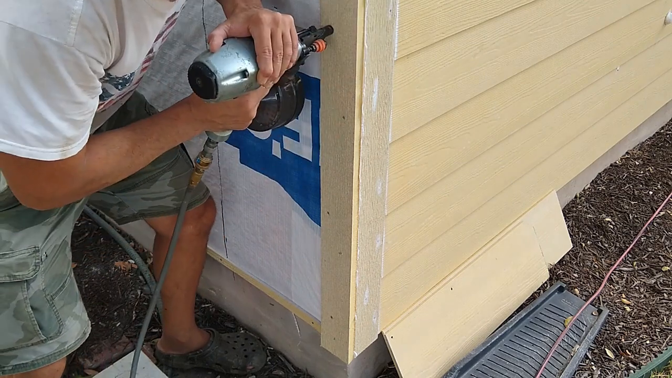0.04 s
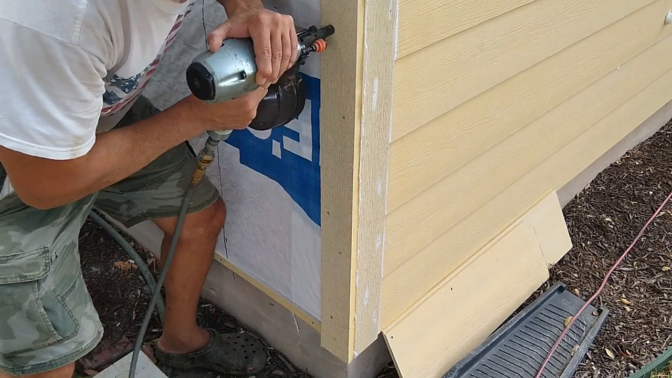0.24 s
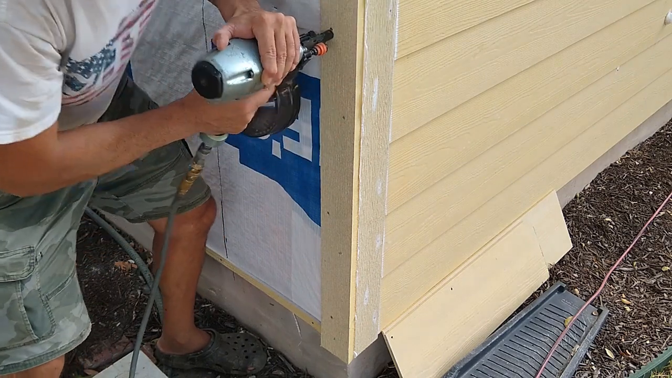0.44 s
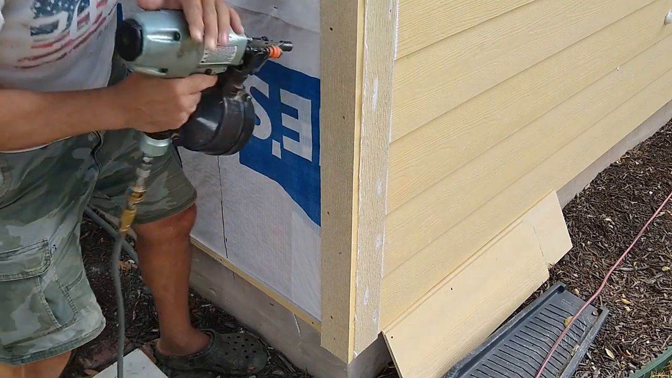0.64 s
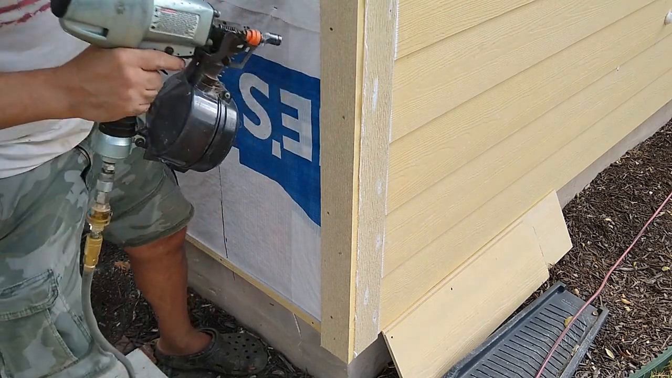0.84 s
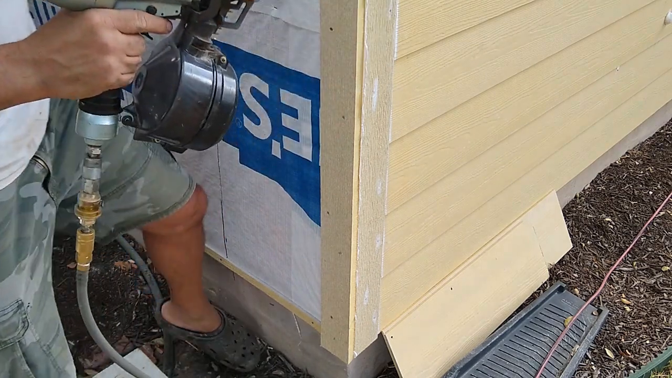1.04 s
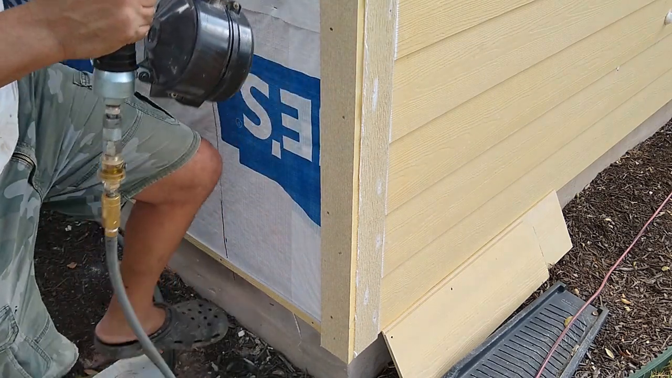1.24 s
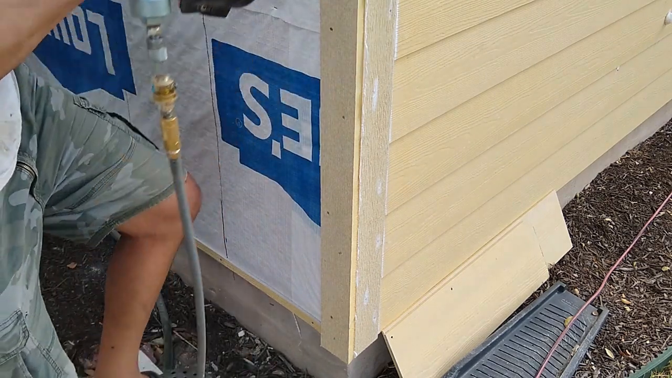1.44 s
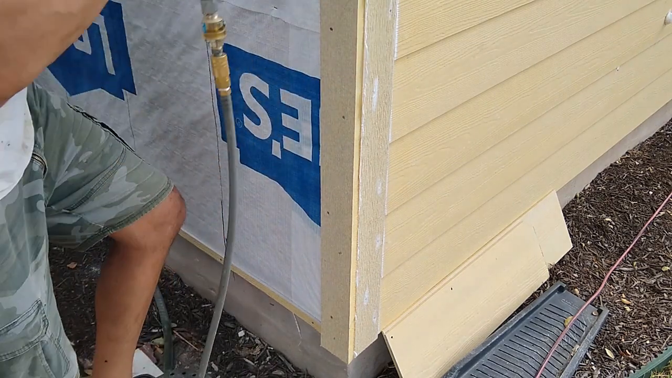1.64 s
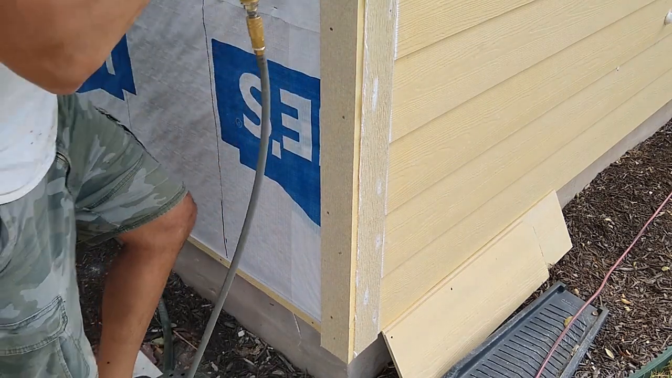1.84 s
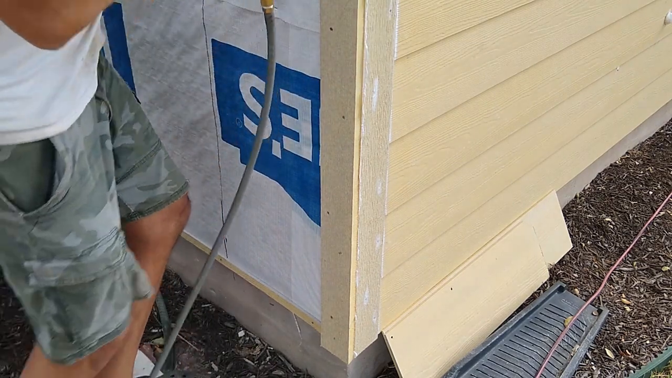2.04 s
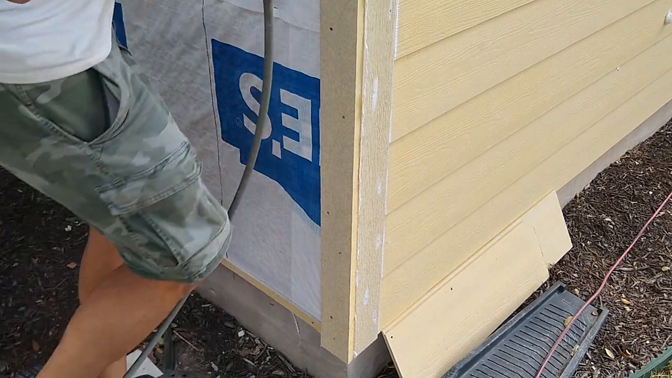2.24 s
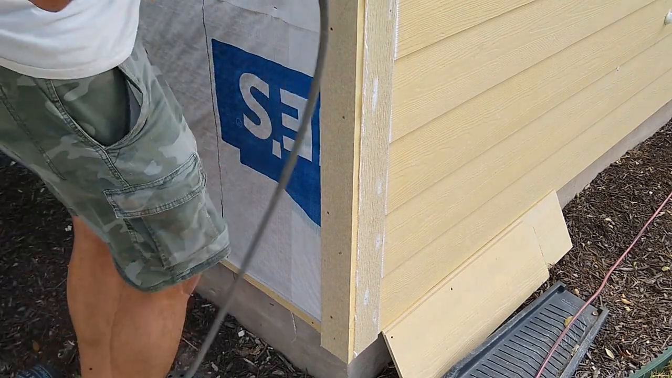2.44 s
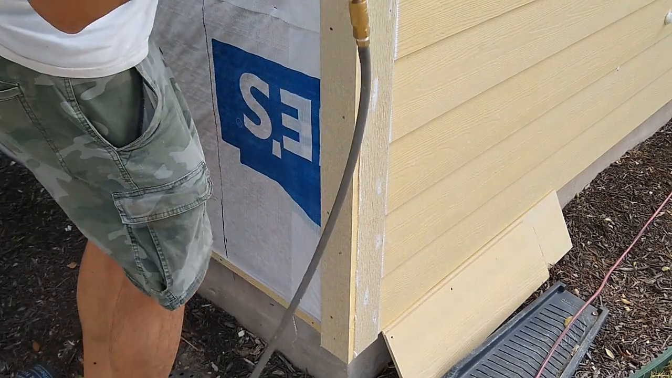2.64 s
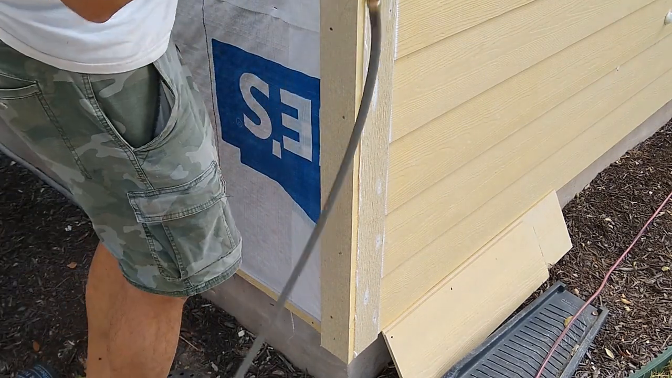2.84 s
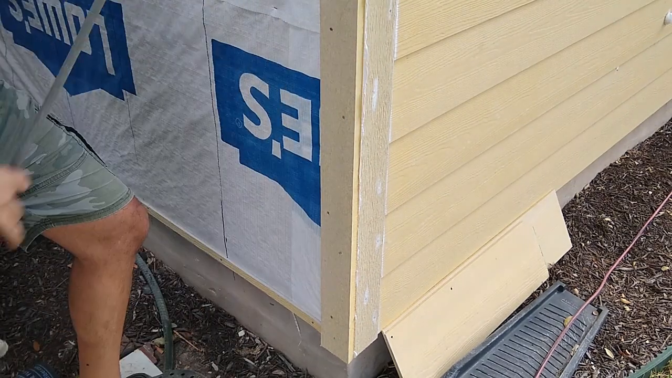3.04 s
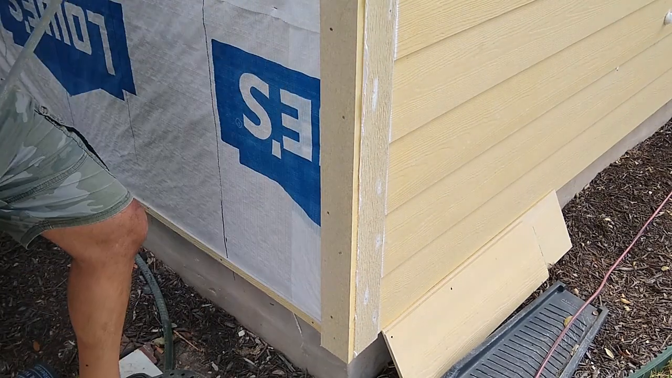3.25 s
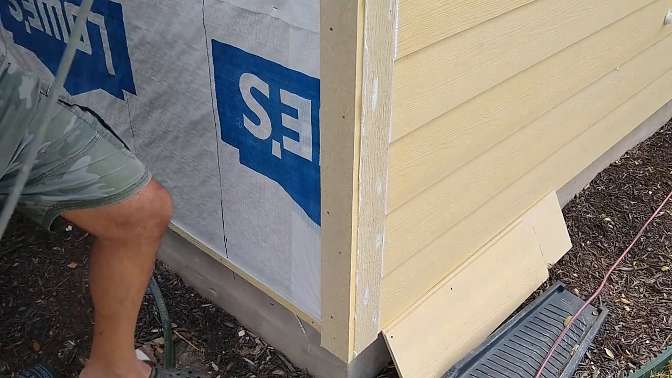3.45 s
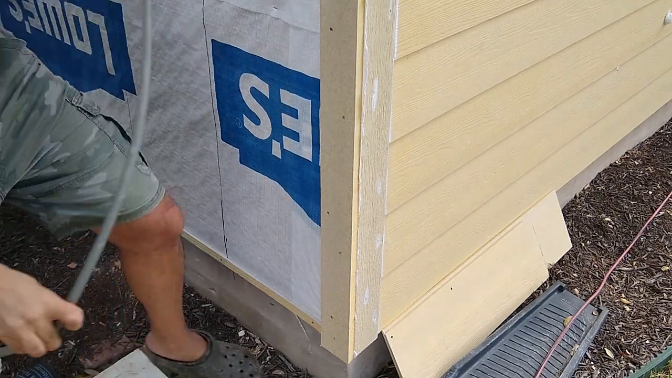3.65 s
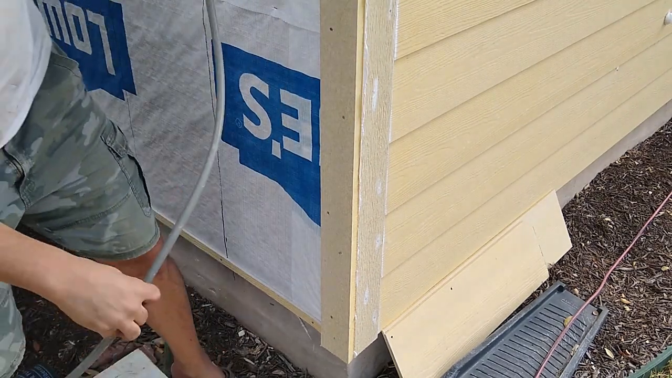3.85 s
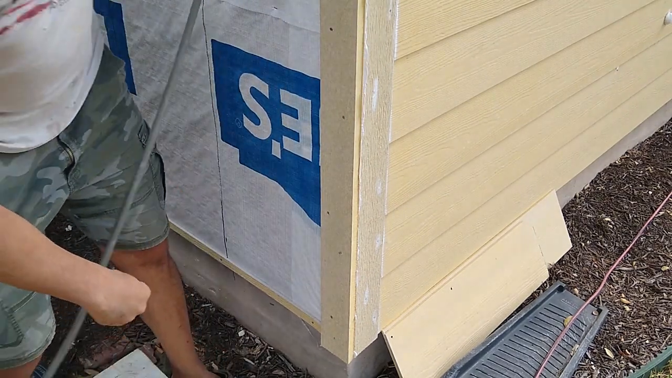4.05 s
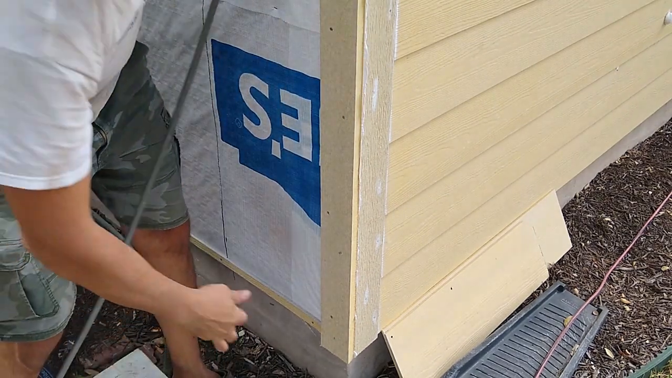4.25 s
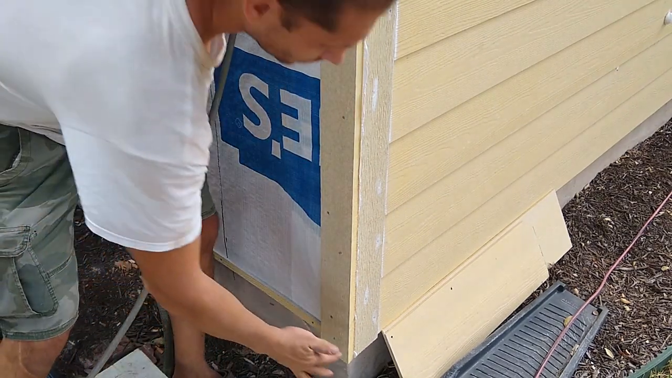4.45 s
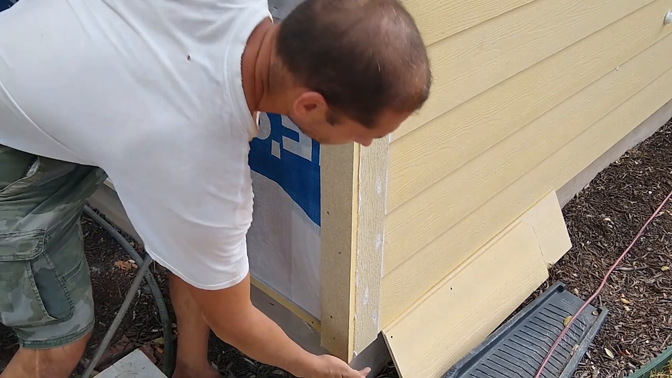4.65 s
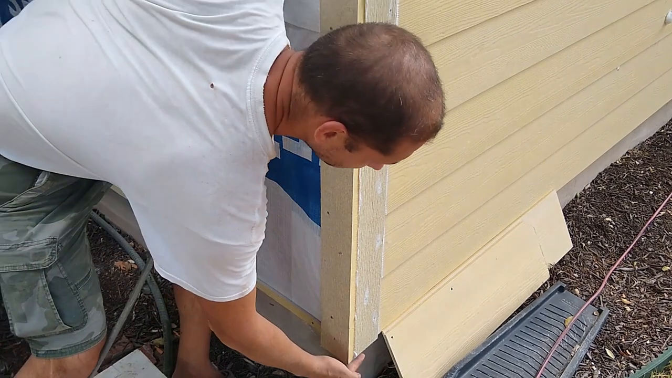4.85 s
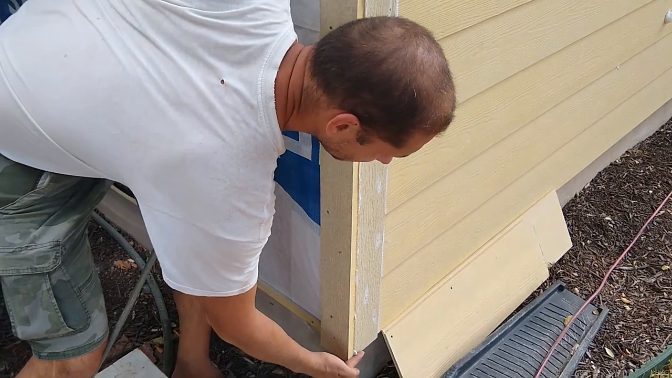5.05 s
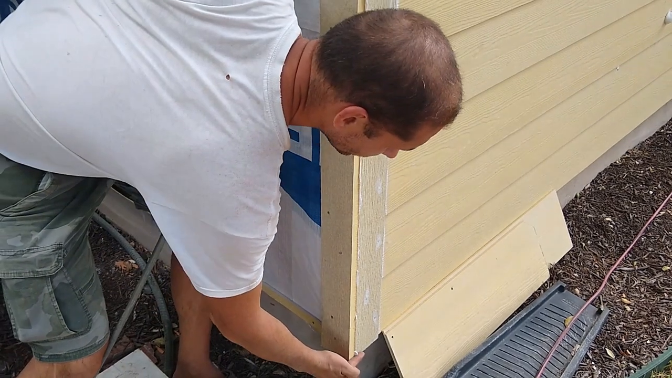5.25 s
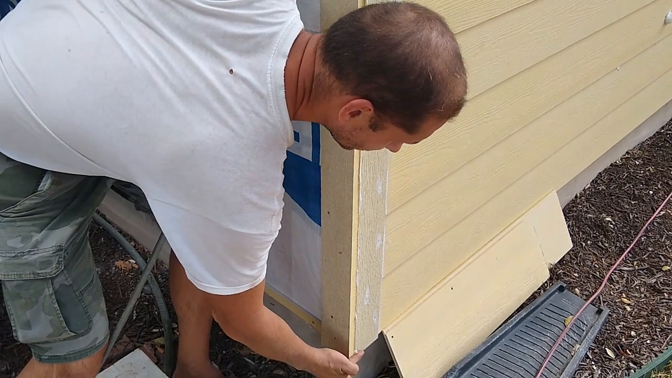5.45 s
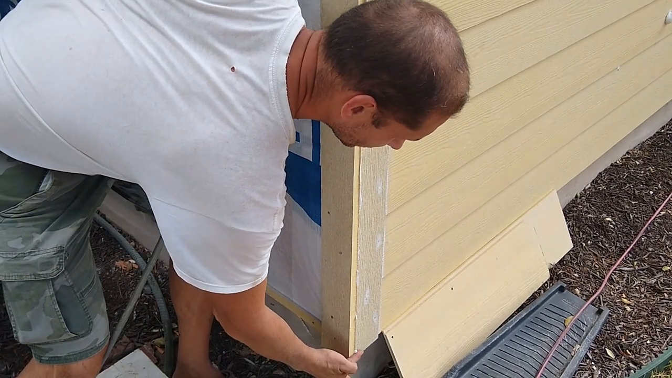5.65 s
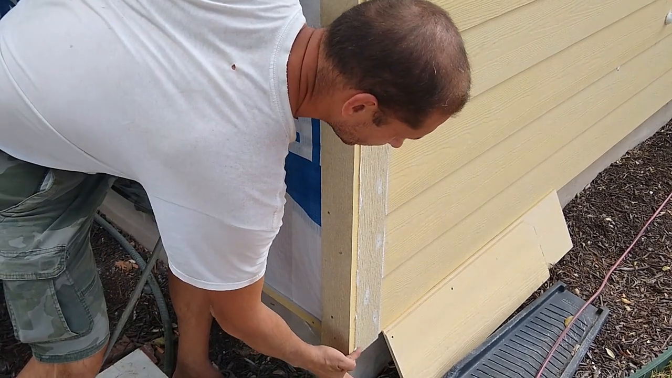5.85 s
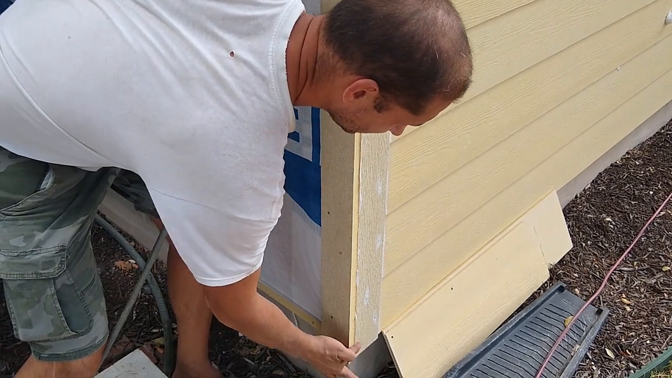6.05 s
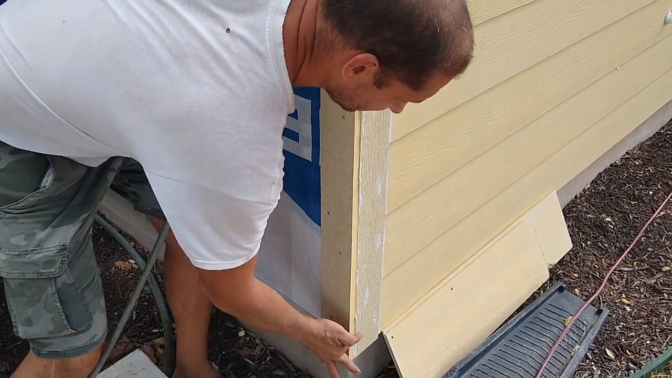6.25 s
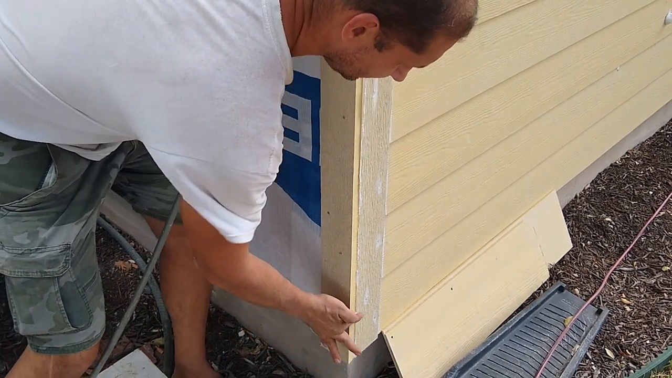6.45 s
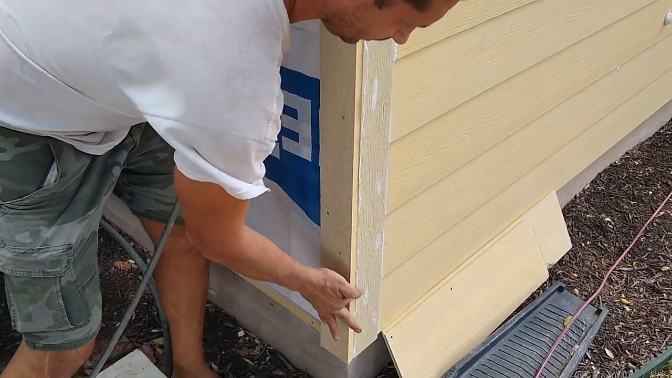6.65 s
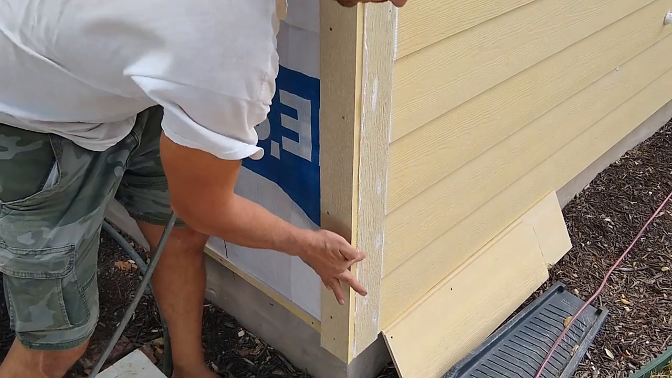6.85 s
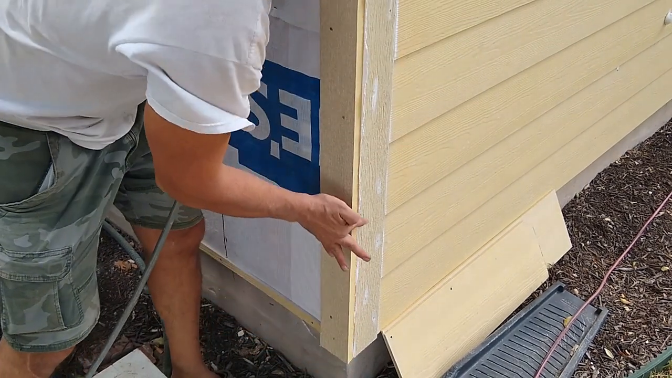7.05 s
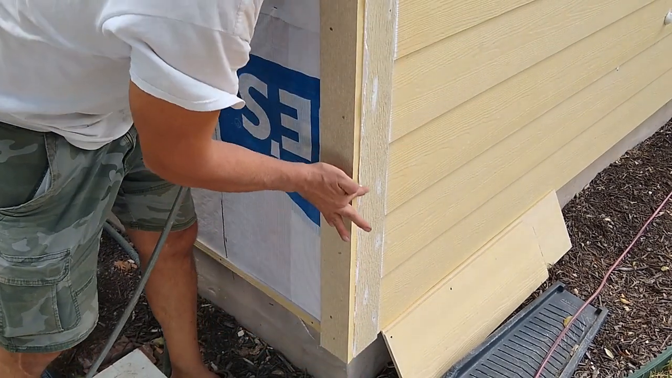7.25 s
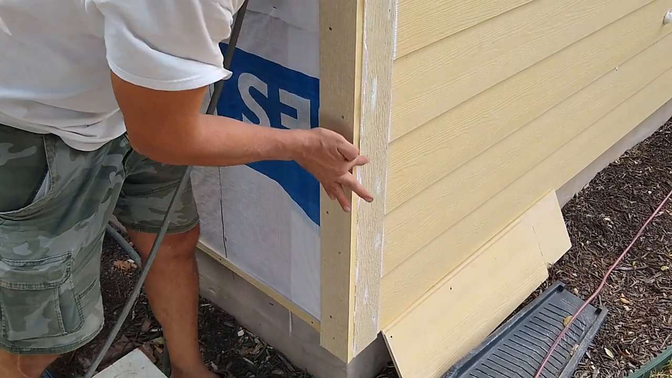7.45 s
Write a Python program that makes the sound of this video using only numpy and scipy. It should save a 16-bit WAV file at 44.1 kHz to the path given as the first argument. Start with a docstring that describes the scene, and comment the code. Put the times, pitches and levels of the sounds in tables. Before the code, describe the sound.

Outdoors beside a house wall, a nail gun knocks lightly against wood with a tiny puff, then fires close by: a hard double crack with a burst of hissing air. Faint clicks and cloth brushes follow over quiet yard air. After a momentary dropout a compressor drones abruptly nearby, and wind gusts increasingly buffet the microphone until the level ducks.

```python
"""First come light knocks and a puff in a quiet yard, as a pneumatic nailer is set against trim on a house
wall. Close to the microphone the driver cracks, air hisses out and the piston returns; blows ring board and
housing, and shaped noise makes the air. The tool clicks and cloth brushes as it is carried off. After a brief
silence the scene changes: a compressor runs nearby, as harmonics of its stroke rate with noise throbbing in
step. Gusts, low noise in opposition at the two microphone ports, buffet more and more until the limiter ducks
under them."""
import sys
import numpy as np
from scipy import signal
from scipy.fft import rfft, irfft, next_fast_len
from scipy.io import wavfile
from scipy.ndimage import uniform_filter1d, map_coordinates

SR = 44100
rng = np.random.default_rng(int(sys.argv[2]) if len(sys.argv) > 2 else 0)


def waveform_to_disk(signal):
    """Save audio, clipped to [-1, 1], as 16-bit WAV at the path in sys.argv[1]."""
    frames = np.transpose(np.atleast_2d(signal))
    scaled = np.clip(frames, -1, 1) * 32767
    samples = np.round(scaled).astype(np.int16)
    wavfile.write(sys.argv[1], SR, samples)


N = 330750  # samples, 7.5 s


def amp(db):
    """Decibels to gain."""
    return 10 ** (np.asarray(db) / 20)


def unit(x):
    """Scaled to rms 1."""
    return x / np.sqrt(np.mean(x ** 2) + 1e-20)


def along(points, hz, column=1):
    """A column of a table read on a log frequency axis."""
    table = np.transpose(points)
    return np.interp(np.log(hz + 1), np.log(table[0] + 1), table[column])


def curves(rows):
    """One value per sample for each column after the time."""
    s, *cols = np.transpose(rows)
    return [np.interp(np.arange(N) / SR, s, c) for c in cols]


def wobble(rate):
    """A smooth random curve, rate knots a second."""
    knots = rng.standard_normal(int(N * rate / SR) + 4)
    return map_coordinates(knots, [np.arange(N) * rate / SR])


def filtered(x, response):
    """x times a response of frequency."""
    m = next_fast_len(x.shape[-1] + 8192)
    spectrum = rfft(x, m) * response(np.fft.rfftfreq(m, 1 / SR))
    return irfft(spectrum, m)[..., :x.shape[-1]]


def noise(spectrum):
    """Two unrelated noises of one colour, rms 1 together."""
    white = rng.standard_normal((2, N))
    return unit(filtered(white, lambda hz: amp(along(spectrum, hz))))


def burst(start, length, attack, t60, curve=1):
    """Gain that rises up to the start, holds for the length and dies away, ever faster if curve is over 1."""
    t = np.arange(N) / SR - start
    fall = np.clip((t - length) / t60, 0, 2) ** curve
    return np.clip(1 + t / attack, 0, 1) * amp(-60 * fall)


PORT_LAG_S = 14 / SR


def spread(pair, image):
    """A direct and a diffuse signal to left and right; in the treble the left port hears the sound first."""
    m = next_fast_len(N + 8192)
    hz, sides = np.fft.rfftfreq(m, 1 / SR), np.array([[1], [-1]])
    treble = np.clip((hz - 1500) / 700, 0, 1)
    phase = 2 * np.pi * (hz * PORT_LAG_S - 1) * treble
    direct = amp(sides * along(image, hz, 2) / 2) * np.exp(-1j * np.outer([0, 1], phase))
    diffuse = sides * direct * amp(along(image, hz))  # opposite in sign at the two ports
    # the sum of both ports keeps the source's own colour
    centre = np.hypot(np.abs(direct.mean(axis=0)), np.abs(diffuse.mean(axis=0)))
    near, scattered = rfft(pair, m)
    return irfft((direct * near + diffuse * scattered) / centre, m)[:, :N]


# distant outdoor noise: f/Hz, level per Hz/dB
YARD_COLOUR = [(18, -40.5), (30, -10), (109, 0), (204, -2.5), (233, -6), (295, -1), (328, -4.5),
               (404, -5.5), (499, -4.5), (600, -5.5), (889, -5.5), (2290, -24), (3670, -27.5),
               (16000, -39.5)]
# the open yard at the two ports: f/Hz, diffuse over direct level/dB, left minus right level/dB
YARD_STEREO = [(60, 10.5, 1), (290, -0.5, 2), (1205.4, -9.5, 1), (2300, -3, 1), (8000, 1, 3)]


def yard():
    """Distant outdoor air, a nearly steady noise from all around the microphone."""
    return spread(amp(-66.5 + 0.5 * wobble(5)) * noise(YARD_COLOUR), YARD_STEREO)


# blows of nose, valve, driver and piston, then handling clicks:
# t/s, knock level/dB, thud level/dB, brightness/dB per octave, basic t60/s
CONTACTS = [(0.036, -37.5, -38, -1, .06), (0.041, -39, -39.5, -2, .1), (0.065, -44.5, -55, -2.5, .08),
            (0.094, -46, -55.5, -1.4, .07), (0.0998, -30.5, -33.5, -1.5, .045),
            (0.103, -30.5, -27.5, -2, .056), (0.127, -49.5, -37, -2.5, .11), (0.362, -57.5, -52.5, 0, .12),
            (0.3964, -15.5, -20, -2, .06), (0.405, -23, -26, -3, .03), (0.411, -24.5, -35, 0.44, .04),
            (0.4151, -13, -28, -5, .02), (0.419, -12, -27.5, -6, .05), (0.51, -16, -33, -3.5, 0.019),
            (0.518, -22.5, -27, -0.5, .084), (0.534, -29.5, -33.5, 0.34, .04),
            (0.547, -32, -33.5, -6.5, .025), (0.640, -36, -41.5, -9, .08), (0.662, -36, -48.5, -5.5, .06),
            (1.640, -47, -62, -5, .042), (2.312, -55, -73, -7.5, .04), (2.346, -70, -54, -9, .04),
            (2.448, -62, -74, -9, .06), (2.604, -34, -52, -5, .043), (2.623, -34.5, -45, -3, .045)]
# knock, clank, snap and spit: low f/Hz, high f/Hz, decay time over the blow's,
# level/dB, octaves above the knock, extra level/dB per dB of force
BLOW_BANDS = [(420, 1700, 0.9, 0.5, 0, 0), (1650, 4200, 0.89, -1.5, 1.77, 0.1653),
              (4500, 8000, 0.75, -5.5, 3, 0), (8000, 16000, 0.75, -1, 5, 0)]
# the board's thud: low f/Hz, high f/Hz, decay time over the blow's
THUD_BAND = (110, 400, 1.3)
# modes of trim board and tool housing: f/Hz, mean level/dB, t60/s
BODY_MODES = [(170, -5, 0.082), (233, 3, 0.085), (380, -5, 0.049), (604, -12, .07), (704, -5, 0.059),
              (850, 1, .05), (944, 2, 0.072), (1138, -1.5, 0.037), (1415, -7, 0.096), (1790, -9, .05),
              (1945, -13, .05), (2445, -10, 0.065), (2860, -11.5, 0.065), (3330, -10.5, 0.065),
              (3240, -9.5, 0.032), (3900, -18.5, 0.14)]
# rattling crack of a contact: f/Hz, level per Hz/dB
CRACK_COLOUR = [(53, -41), (90, -9.5), (205, -4.5), (737, 4), (915, -1.5), (1540, -8.5), (1910, -9),
                (2320, -29), (2530, -4), (3290, -4.5), (4450, -30.5), (5410, -19), (6720, -30),
                (13500, -23.5), (16000, -26)]
MEDIUM_BLOW_DB = -33


def blows(ring_db=-6, damping=3.4, rise_s=0.00032):
    """Each blow rings board and housing and sets off a short rattling crack; brightness varies by blow."""
    t = np.arange(SR // 4) / SR
    out, crack = np.zeros((2, N)), noise(CRACK_COLOUR)
    hz, mode_db, mode_t60 = np.transpose(BODY_MODES)[:, :, None]
    modes = np.sin(2 * np.pi * hz * t) * amp(-60 * t / mode_t60)
    for s, knock_db, thud_db, brightness, t60 in CONTACTS:
        at = slice(round(s * SR), round(s * SR) + len(t))
        shape = (2, len(BODY_MODES), 1)
        strength = amp(mode_db + 3.5 * rng.standard_normal(shape)) * rng.choice([-1, 1], shape)
        ring = amp(ring_db) * np.sum(strength * modes, axis=1)
        force_db = knock_db - MEDIUM_BLOW_DB  # heavy blows bring out the steel's clank
        parts = [(*THUD_BAND, thud_db)]
        for *register, db, octaves, growth in BLOW_BANDS:
            parts.append((*register, knock_db + db + brightness * octaves + growth * force_db))
        for low_hz, high_hz, life, db in parts:
            band = signal.butter(3, [low_hz, min(high_hz, .45 * SR)], "band", fs=SR, output="sos")
            fall_db = -60 * t / (t60 * life)
            struck = crack[:, at] * amp(fall_db) + ring * amp(fall_db / damping)  # pressed tool damps the ring
            part = signal.sosfilt(band, struck * (1 - np.exp(-t / rise_s)))
            loudest = uniform_filter1d(part ** 2, size=SR // 160, axis=1).max(axis=1, keepdims=True)
            out[:, at] += amp(db) * part / np.sqrt(loudest)
    return out


# the exhaust valve opens: t/s, open time/s, basic emptying time/s, hiss level/dB, rush level/dB
VALVE_OPENINGS = [(0.11, 0.011, .13, -60.5, -49.5), (0.403, 0.23, 0.22, -43, -35.5)]
# bright hiss at the vent: f/Hz, level per Hz/dB
HISS_COLOUR = [(2530, -35.5), (4300, -9.5), (5240, 1.5), (6790, -5), (10900, -1.5), (14300, -1.5),
               (14900, -2), (15700, -6), (16000, -7.5)]
# rush from the cap: f/Hz, level per Hz/dB
RUSH_COLOUR = [(71, -29), (120, -7), (189, -1.5), (320, -12.5), (558, -4.5), (630, -8), (789, -0.5),
               (851, -19.5), (1020, -10.5), (1440, -11), (1840, -11.5), (2200, -37.5), (2340, -23),
               (2930, -10.5), (4400, -20.5), (5720, -48.5), (9680, -120)]
VENT_ATTACK_S, VENT_CURVE = 0.0091, 1.6
RUSH_SAG_DB_PER_S, HOLLOW_HZ = 38.5, 2200  # the rush's hollow low part sinks with the pressure
HOLLOW_LINGERS = 1.15  # times the emptying time


def exhaust():
    """Spent air: a bright hiss at the vent over a hollow rush from the cap."""
    t = np.arange(N) / SR
    hiss, rush, out = noise(HISS_COLOUR), noise(RUSH_COLOUR), np.zeros((2, N))
    hollow = filtered(rush, lambda hz: hz < HOLLOW_HZ)
    for s, length, emptying, hiss_db, rush_db in VALVE_OPENINGS:
        flow = burst(s, length, VENT_ATTACK_S, emptying, VENT_CURVE)
        hollow_flow = burst(s, length, VENT_ATTACK_S, HOLLOW_LINGERS * emptying, VENT_CURVE)
        sag_db = RUSH_SAG_DB_PER_S * np.clip(t - s, 0, length)
        out += flow * (amp(hiss_db) * hiss + amp(rush_db) * (rush - hollow))
        out += amp(rush_db - sag_db) * hollow_flow * hollow
    return amp(1.0 * wobble(90)) * out


# short reverberation of house wall and ground: f/Hz, t60/s
WALL_DECAY = [(150, 0.2), (1000, 0.2), (4000, .2), (14000, .12)]


def walls(x):
    """The short scattered answer of house wall and ground, decaying noise that starts after 1/150 s."""
    hz, t, z = signal.stft(rng.standard_normal((2, SR // 2)), SR, nperseg=256)
    decay = amp(-60 * t / along(WALL_DECAY, hz)[:, None])
    tail = signal.istft(z * decay, SR, nperseg=256)[1]
    delayed = np.pad(tail, ((0, 0), (SR // 150, 0)))
    return signal.fftconvolve(x, delayed / np.linalg.norm(tail[0]), axes=1)[:, :N]


# the tool at the two ports: f/Hz, diffuse over direct level/dB, left minus right level/dB
TOOL_STEREO = [(100, 4.5, -1.5), (250, -6.5, 0.5), (500, -15, 2), (1000, -14, -0.5), (2300, -12.5, 1),
               (4394, -4.5, 0), (8000, -4.5, 7.5), (15030, -4.5, 7)]


def nailer():
    """Blows and exhaust close to the microphone, with a faint answer from the wall."""
    dry = blows() + exhaust()
    return spread(dry + amp(-18.5) * walls(dry), TOOL_STEREO)


# brushes of cloth and hose: t/s, length/s, level/dB
CLOTH_BRUSHES = [(1.12, 0.11, -83.5), (1.7, .04, -81), (2.07, 0.033, -80.5), (2.2, .07, -79),
                 (2.72, .04, -78.5)]
# colour of the brushing: f/Hz, level per Hz/dB
CLOTH_COLOUR = [(600, -25), (1400, 2), (2200, -8), (3300, 3), (5500, -14), (8000, -12), (15000, -6)]
BRUSH_ATTACK_S, BRUSH_T60_S = .04, 0.3


def clothes():
    """Shorts and hose brush faintly as the worker steps aside: swelling, uneven noise."""
    level = sum(amp(db) * burst(s, length, BRUSH_ATTACK_S, BRUSH_T60_S) for s, length, db in CLOTH_BRUSHES)
    return spread(level * amp(3.0 * wobble(60)) * noise(CLOTH_COLOUR), YARD_STEREO)


# mean compressor speed: t/s, stroke rate f/Hz
STROKE_RATE = [(3.1, 43.07), (4.15, 43.06), (4.5, 43.0), (7.5, 42.98)]
# harmonics of one stroke: multiple of the stroke rate, relative level/dB
STROKE_HARMONICS = [(1, -44), (2, -13.5), (3, -14), (4, -6), (5, -8.5), (6, -12), (7, -10), (8, -12.5),
                    (9, -29), (10, -18.5), (11, 0.5), (12, 1.5), (13, -4), (14, -1), (15, -10.5), (16, -44),
                    (17, -17.5), (18, -13), (19, -15.5), (20, -7), (21, -7), (22, -1.5), (23, -1.5),
                    (24, -6), (25, -13.5), (26, -24), (27, -13), (28, -10.5), (29, -24.5), (30, -11),
                    (31, -16), (32, -60), (33, -43), (34, -46), (35, -23), (36, -47), (37, -18), (38, -36)]
# stereo lean of the pulses: f/Hz, side over mid
PULSE_LEAN = [(90, 0.84), (200, 1.65), (330, 1.7), (500, 0.56), (700, 0.38), (1000, 0.034), (1600, 0.08)]


def strokes(turn, scatter=0.58, dispersion=0.0212):
    """One pressure pulse per piston stroke, summed from its harmonics; mid level at rms 1."""
    pulse, loudest = np.zeros((2, N)), max(STROKE_HARMONICS, key=lambda row: row[1])[0]
    for order, db in STROKE_HARMONICS:
        # high orders arrive a little later
        smear = scatter * rng.standard_normal() - dispersion * (order - loudest) ** 2
        line = amp(db + 0.7 * wobble(10)) * np.cos(order * turn + smear)
        lean = along(PULSE_LEAN, order * STROKE_RATE[0][1])
        pulse += np.outer(1 + np.array([1, -1]) * lean, line)
    pulse = pulse * amp(0.52 * wobble(40))  # stroke strength wanders
    return pulse / np.std(pulse.mean(axis=0))


# valve plate and cylinder head resonances: f/Hz, width/Hz, level/dB
HEAD_RESONANCES = [(1596, 72, -3), (2570, 410, -9.5), (2883, 62, -5.5), (3721, 44, 1.5), (4160, 82, -8.5),
                   (4705, 35, -9), (5670, 540, -24)]


def clatter(turn, size=4096):
    """The valves repeat the same rattle on every stroke: thin lines under the resonances of the head."""
    hz = np.arange(size // 2 + 1) * STROKE_RATE[0][1]
    head = sum(amp(db) / (1 + ((hz - centre) / (width / 2)) ** 2) for centre, width, db in HEAD_RESONANCES)
    uneven = amp(1.5 * rng.standard_normal(len(hz)))
    cycles = irfft(head * uneven * np.exp(2j * np.pi * rng.random((2, len(hz)))))
    place = turn / (2 * np.pi) % 1 * size
    return unit(np.array([np.interp(place, np.arange(size), cycle) for cycle in cycles]))


# whine: t/s, level of each tone/dB
WHINE_LEVEL = [(5.8, -84), (6.4, -60)]
# whine tones: multiples of the stroke rate
WHINE_MULTIPLES = [68, 86, 87]


def shaft_whine(turn):
    """Thin shaft-locked tones, each wavering in level."""
    tones = sum(amp(2 * wobble(6.6)) * np.sin(order * turn) for order in WHINE_MULTIPLES)
    return amp(curves(WHINE_LEVEL)[0]) * tones


# the compressor is heard more openly as the worker bends down: t/s, level/dB
OPENNESS = [(3.8, -1), (4.8, 2.5), (5.8, 1.5)]
# bright air noise: f/Hz, level per Hz/dB
AIR_COLOUR = [(820, -14), (1400, -7), (1630, 0), (2210, -9), (2610, -5.5), (3230, -7.5), (3690, -6),
              (4430, -15), (5660, -13), (6870, -22.5), (9230, -18.5), (12000, -17), (13300, -15),
              (15400, -18.5), (16000, -16.5)]
# low intake chuff: f/Hz, level per Hz/dB
CHUFF_COLOUR = [(59, -50), (100, -21), (179, -14), (412, -8.5), (507, -10), (702, -16), (972, -12),
                (1140, -18.5), (1600, -29.5), (2080, -48), (3520, -120)]
# the compressor at the two ports: f/Hz, diffuse over direct level/dB, left minus right level/dB
PUMP_STEREO = [(100, 2, 9.9), (380, -1, 5.1), (700, 0, 1.7), (1200, -9, 0.93), (1940, 5.5, 3.3),
               (3260, -6, 5.3), (4440, -5, 1.8), (8550, -5, 9.2)]
PUMP_AIR_DB, CHUFF_DB, PULSE_DB, VALVES_DB = -46.5, -41, -34.5, -54  # before the swell
AIR_FOLLOWS, VALVES_FOLLOW = 0.32, 0.85  # dB per dB of the swell


def compressor(chuff_depth=0.27, air_depth=0.054, first_stroke_s=3.110):
    """Nearby piston pulses, with valve clatter and intake noise that throbs in step."""
    rate_hz = curves(STROKE_RATE)[0] * (1 + 0.00051 * wobble(12))
    turn = 2 * np.pi * np.cumsum(rate_hz) / SR
    turn = turn - np.interp(first_stroke_s * SR, np.arange(N), turn)
    swell_db, = curves(OPENNESS)
    pulse = amp(PULSE_DB + swell_db) * strokes(turn)
    air = amp(PUMP_AIR_DB + AIR_FOLLOWS * swell_db) * noise(AIR_COLOUR) * (1 + air_depth * np.cos(turn))
    chuff = amp(CHUFF_DB) * noise(CHUFF_COLOUR) * (1 + chuff_depth * np.cos(turn))
    valves = amp(VALVES_DB + VALVES_FOLLOW * swell_db) * clatter(turn)
    whine = np.outer([1, 0], shaft_whine(turn))  # direct sound only
    return pulse + spread(air + chuff + valves + whine, PUMP_STEREO)


# steady air flow under the gusts: t/s, rumble level before the port filter/dB
BREEZE_LEVEL = [(3.5, -72), (4.3, -39.5), (5.0, -34.5), (5.4, -23.5), (6.4, -24), (6.8, -31), (7.35, -13.5)]
# gusts that strike the ports: t/s, length/s, rumble level before the port filter/dB, flutter level/dB
GUST_STRIKES = [(4.512, .03, -26.5, -42), (4.61, 0.04, -26.5, -40), (4.942, 0.032, -30, -55),
                (5.094, .2, -17.5, -45), (5.165, 0.015, -11, -39), (5.39, 0.11, -19, -53),
                (5.705, 0.0081, -15, -32), (5.977, .22, -20, -48), (6.122, 0.039, -12.5, -27),
                (6.262, 0.0086, -8, -25), (6.32, .03, -13.5, -42), (6.443, .07, -22.5, -55),
                (6.59, 0.047, -23, -56), (6.906, 0.032, -8.5, -34), (6.993, 0.013, -8.5, -16.5),
                (7.086, 0.056, -9.5, -16.5), (7.205, 0.056, -10, -20), (7.384, .05, -25, -45.5)]
# rumble of eddies: f/Hz, level per Hz/dB
RUMBLE_COLOUR = [(20, -29), (45, -18.5), (75, -4.5), (110, -1), (200, -6.5), (300, -16), (450, -22.5),
                 (700, -37.5), (1200, -39), (2500, -90)]
# flutter of fast gusts: f/Hz, level per Hz/dB
FLUTTER_COLOUR = [(80, -28), (200, 7.5), (320, 11), (600, 9), (950, 3.5), (1400, -6.5), (1900, -20),
                  (3000, -47), (6000, -80)]
# wind at the two ports: f/Hz, diffuse over direct level/dB, left minus right level/dB
PORT_STEREO = [(60, 17.5, 0), (136, 14.5, 0.004), (295, 5.5, 0), (616, 0, 0), (1150, -17.5, 0),
               (2180, 14, 0)]
GUST_ATTACK_S, GUST_T60_S, FLUTTER_T60_S, GUST_CURVE = 0.024, 0.21, 0.14, 1.43


def wind():
    """Low eddy noise, opposite in sign at left and right; gusts ride on the breeze, and the fastest also
    flutter higher up."""
    power, fast = amp(curves(BREEZE_LEVEL)[0]) ** 2, np.zeros(N)
    for s, length, rumble_db, flutter_db in GUST_STRIKES:
        power = power + (amp(rumble_db) * burst(s, length, GUST_ATTACK_S, GUST_T60_S, GUST_CURVE)) ** 2
        fast += amp(flutter_db) * burst(s, length, GUST_ATTACK_S, FLUTTER_T60_S, GUST_CURVE)
    eddies = noise(RUMBLE_COLOUR)
    # even out the noise so that each gust keeps its own strength
    eddies = eddies / np.sqrt(np.abs(uniform_filter1d(eddies ** 2, SR // 20, axis=1)) + 1e-6)
    lumpy = np.sqrt(power) * amp(2.1 * wobble(55)) * eddies
    # port filter: offsets the boost of the diffuse part
    rumble = filtered(lumpy, lambda hz: amp(-np.maximum(along(PORT_STEREO, hz), 0)))
    flutter = fast * amp(1.4 * wobble(110)) * noise(FLUTTER_COLOUR)
    return spread(rumble + flutter, PORT_STEREO)


QUIET_END_S, PUMP_START_S = 3.069, 3.093


def scene():
    """The nailer in a quiet yard, a brief silence, then the scene changes to compressor and wind."""
    t = np.arange(N) / SR
    fade_in = np.clip((t - PUMP_START_S) / .002, 0, 1)
    return (yard() + nailer() + clothes()) * (t < QUIET_END_S) + (compressor() + wind()) * fade_in


LIMIT_DB, LIMIT_RELEASE_DB_PER_S, LIMIT_ATTACK_S = -2.5, 34, .002


def limiter(x):
    """Peaks over the limit quickly turn both channels down together; the gain creeps back."""
    over_db = np.maximum(20 * np.log10(np.abs(x).max(axis=0) + 1e-9) - LIMIT_DB, 0)
    recovery_db = LIMIT_RELEASE_DB_PER_S * np.arange(N) / SR
    cut_db = np.maximum.accumulate(over_db + recovery_db) - recovery_db
    return x * amp(-uniform_filter1d(cut_db, size=1 + int(LIMIT_ATTACK_S * SR)))


TOP_HZ = 15800


def record(dry):
    """The microphone's limiter ducks, the peaks left are rounded off and a steep filter ends the treble."""
    ducked = limiter(dry)
    held = ducked / (1 + np.abs(ducked) ** 8) ** (1 / 8)
    return filtered(held, lambda hz: 1 / (1 + (hz / TOP_HZ) ** 120))


dry = scene()
out = record(dry)
waveform_to_disk(out)
```